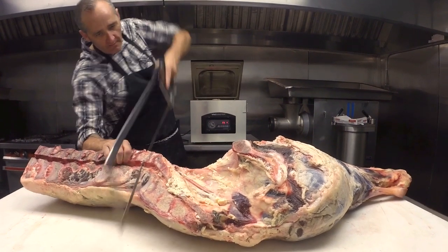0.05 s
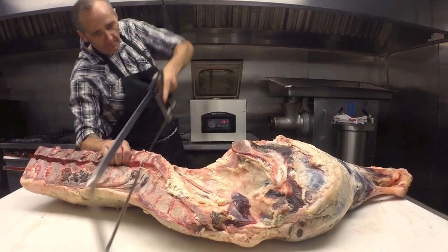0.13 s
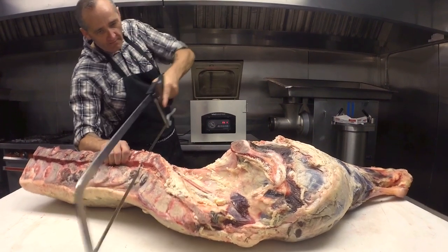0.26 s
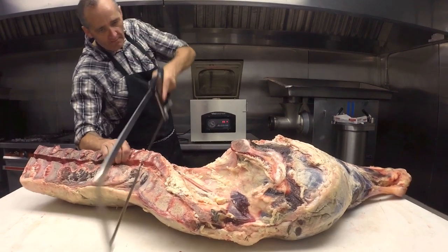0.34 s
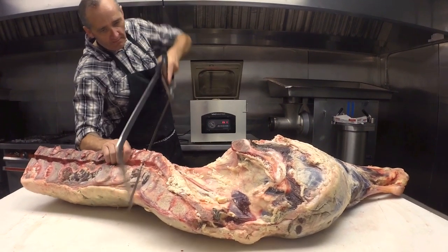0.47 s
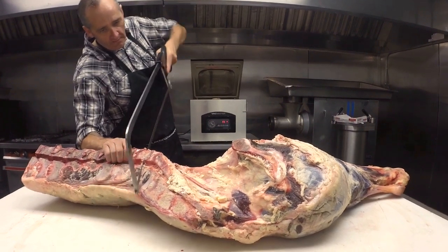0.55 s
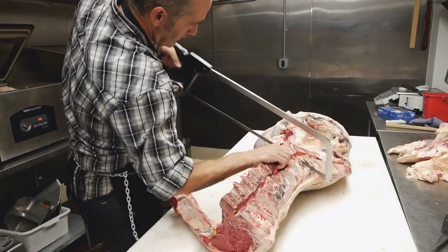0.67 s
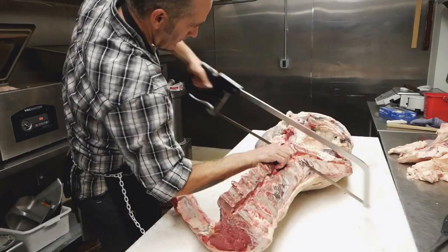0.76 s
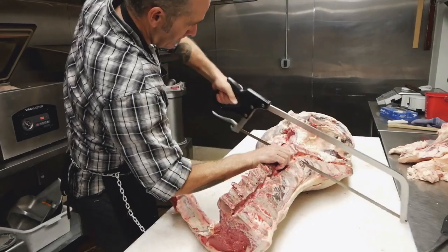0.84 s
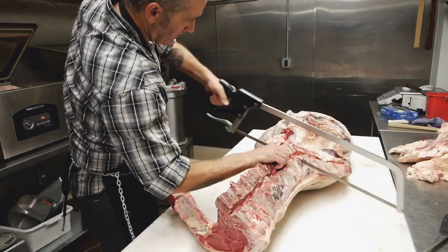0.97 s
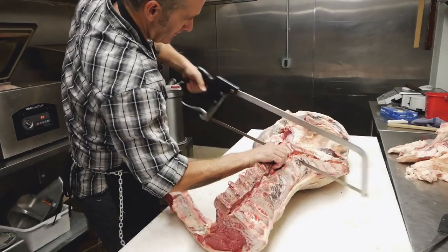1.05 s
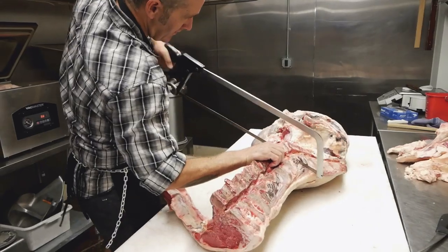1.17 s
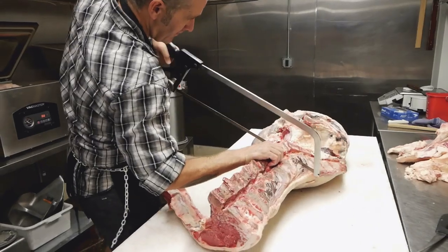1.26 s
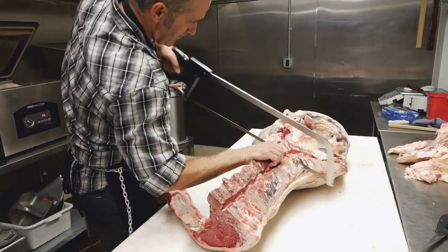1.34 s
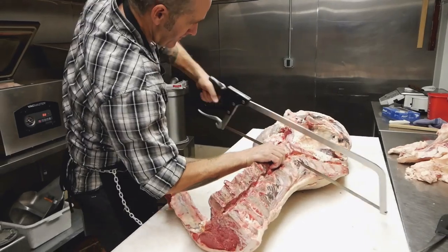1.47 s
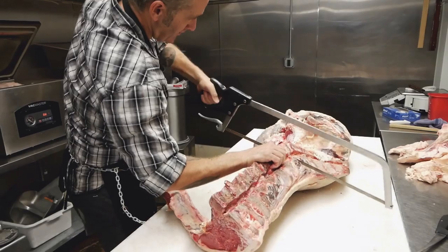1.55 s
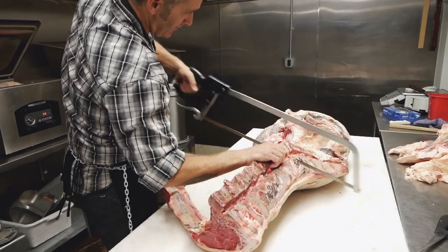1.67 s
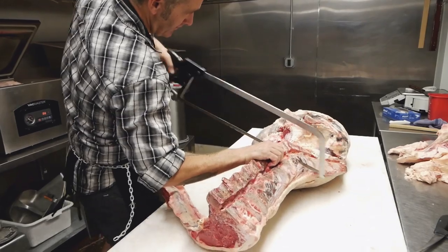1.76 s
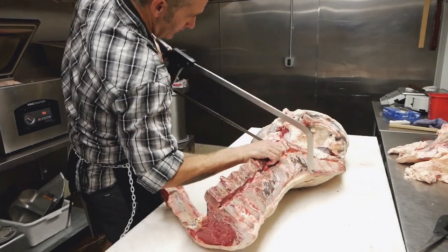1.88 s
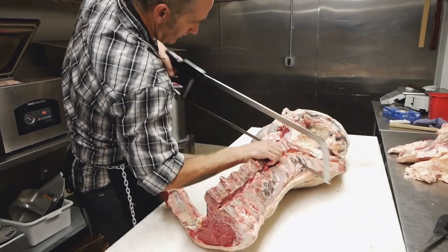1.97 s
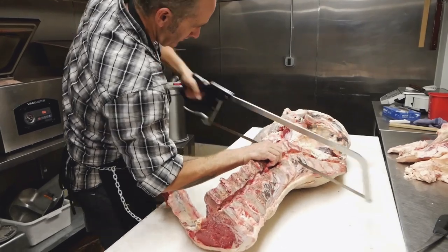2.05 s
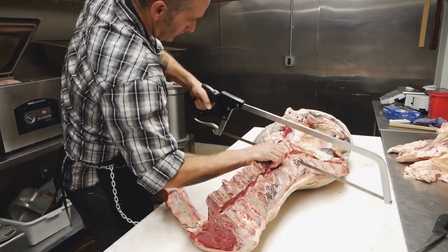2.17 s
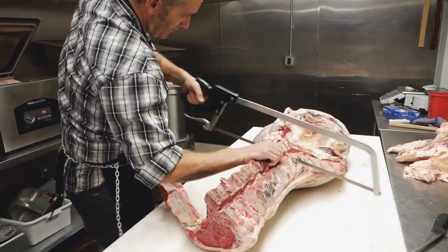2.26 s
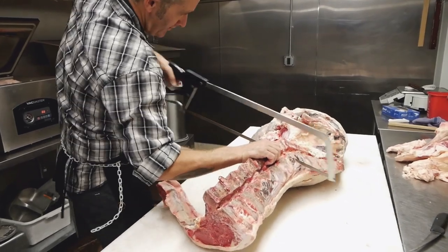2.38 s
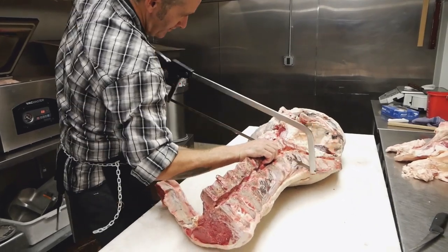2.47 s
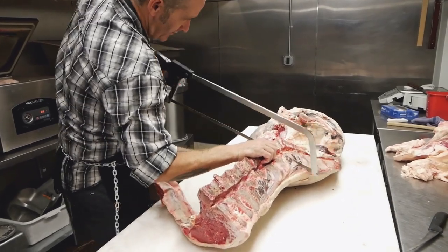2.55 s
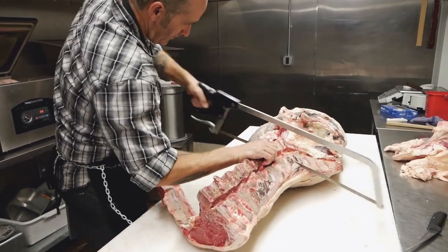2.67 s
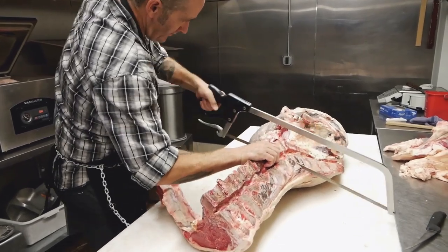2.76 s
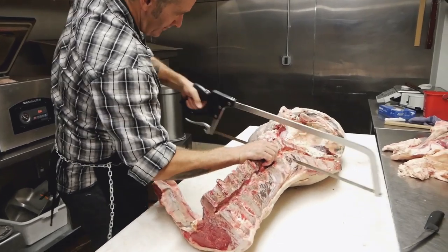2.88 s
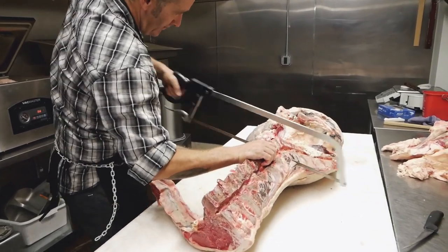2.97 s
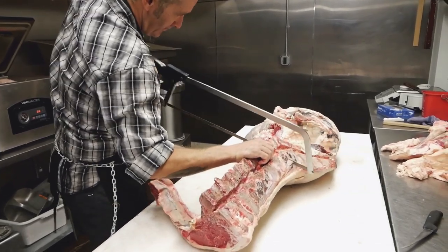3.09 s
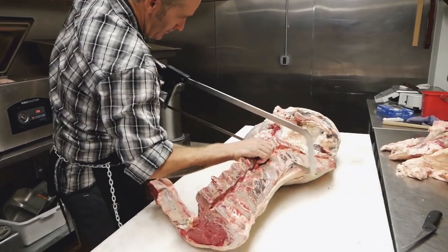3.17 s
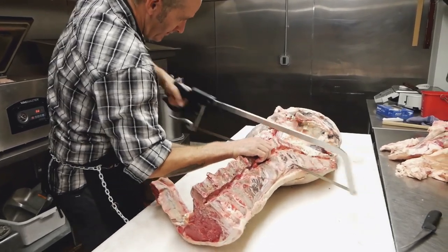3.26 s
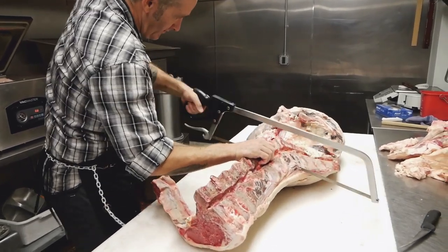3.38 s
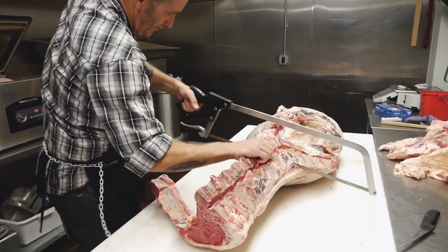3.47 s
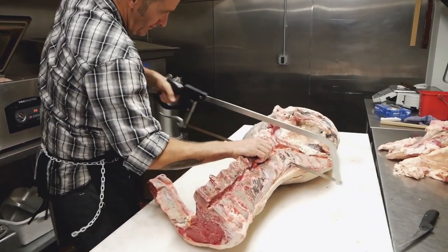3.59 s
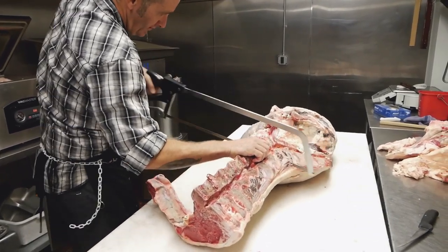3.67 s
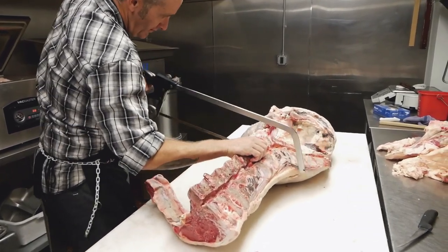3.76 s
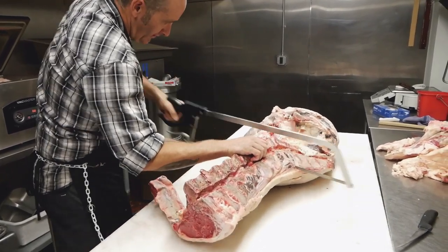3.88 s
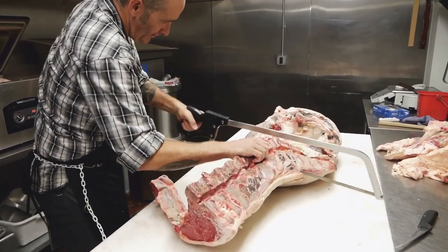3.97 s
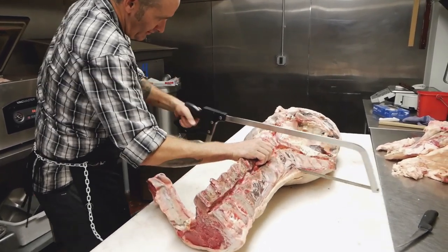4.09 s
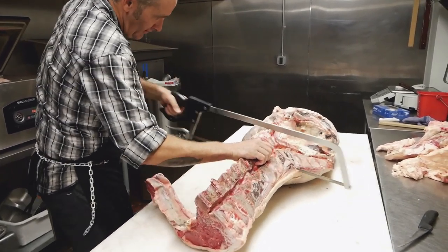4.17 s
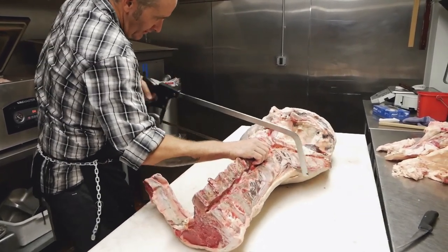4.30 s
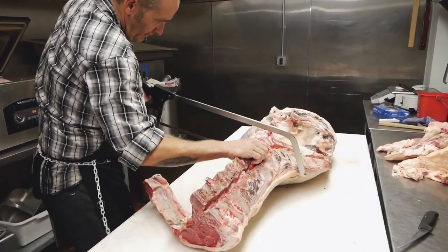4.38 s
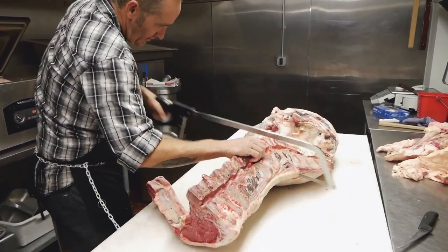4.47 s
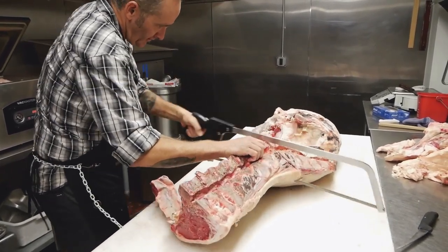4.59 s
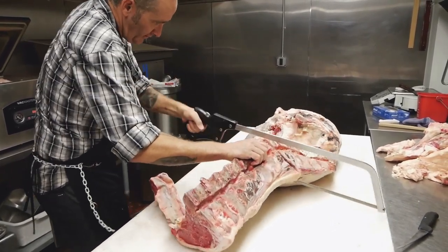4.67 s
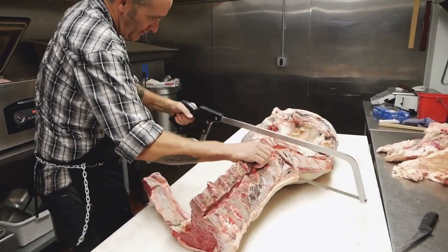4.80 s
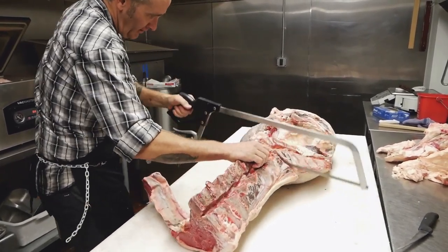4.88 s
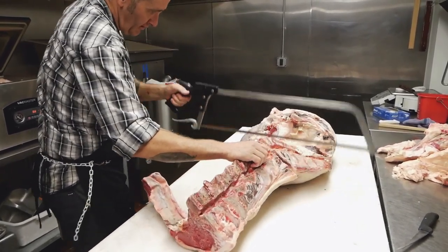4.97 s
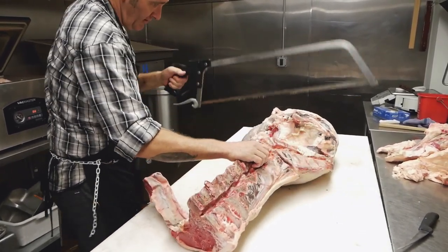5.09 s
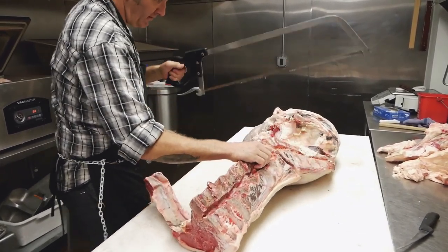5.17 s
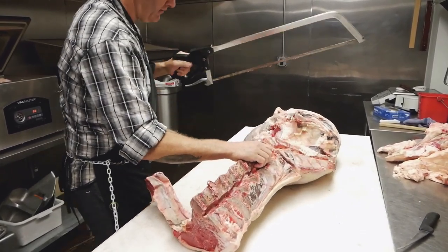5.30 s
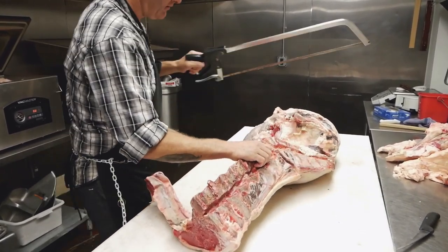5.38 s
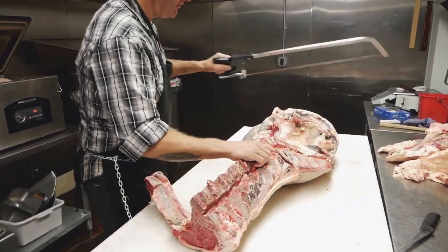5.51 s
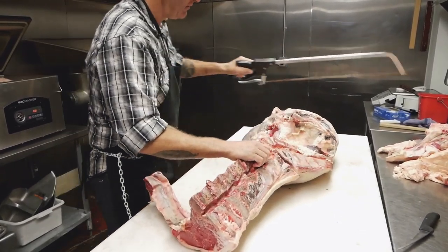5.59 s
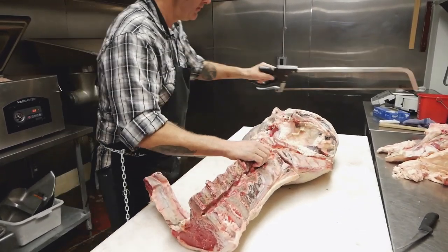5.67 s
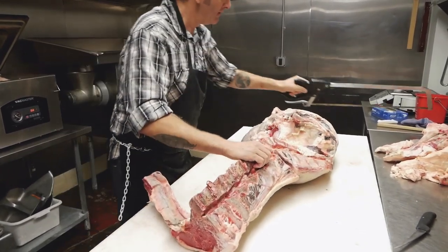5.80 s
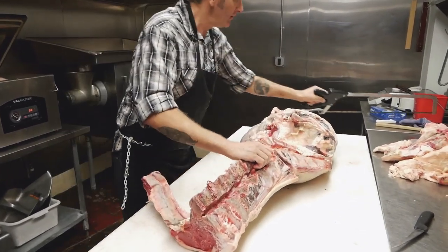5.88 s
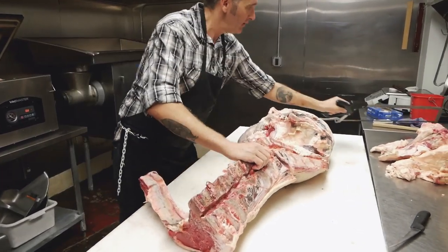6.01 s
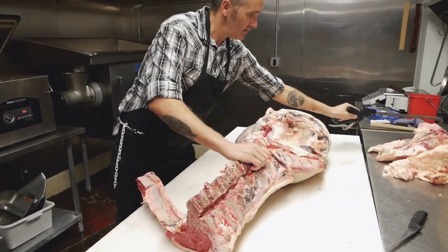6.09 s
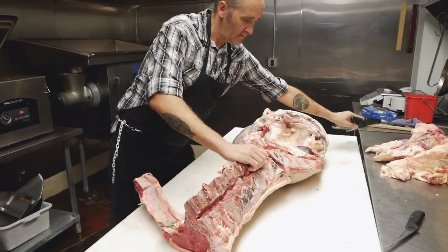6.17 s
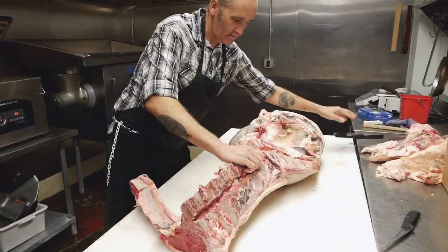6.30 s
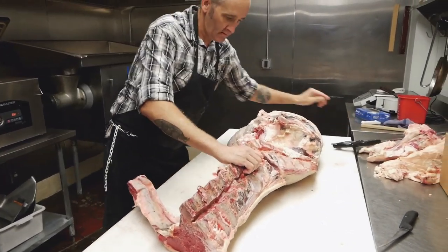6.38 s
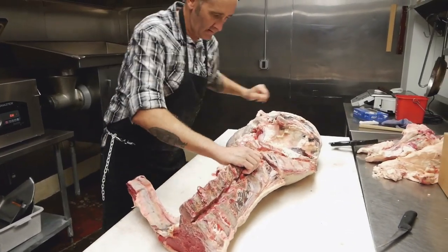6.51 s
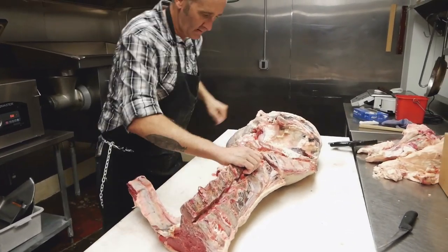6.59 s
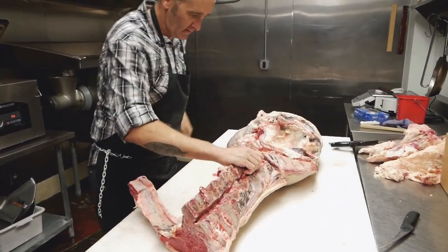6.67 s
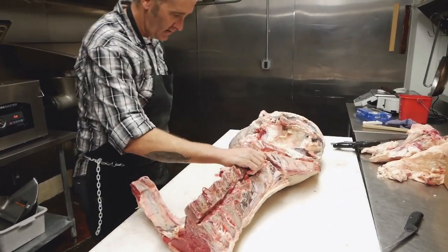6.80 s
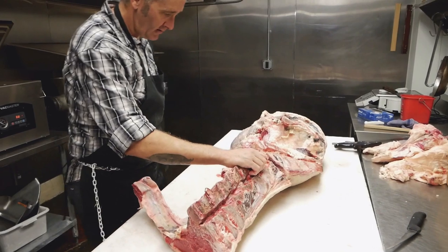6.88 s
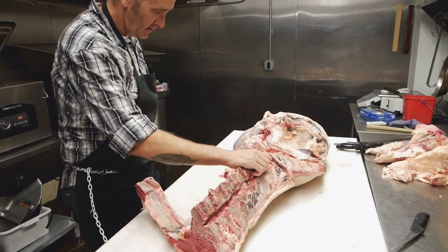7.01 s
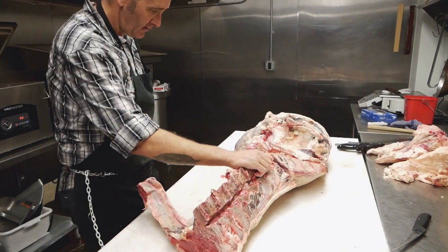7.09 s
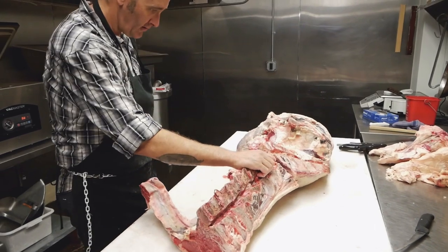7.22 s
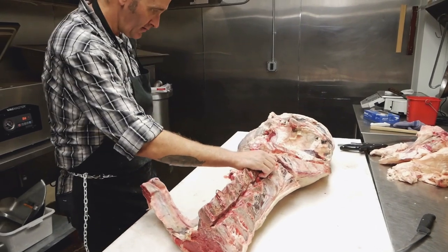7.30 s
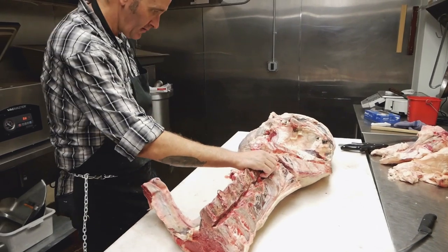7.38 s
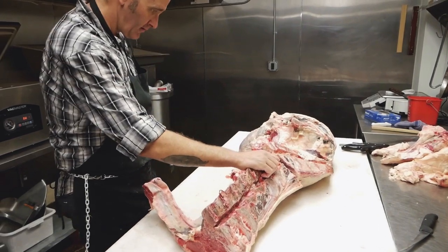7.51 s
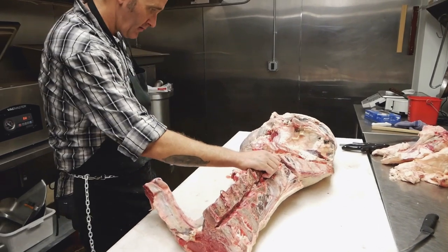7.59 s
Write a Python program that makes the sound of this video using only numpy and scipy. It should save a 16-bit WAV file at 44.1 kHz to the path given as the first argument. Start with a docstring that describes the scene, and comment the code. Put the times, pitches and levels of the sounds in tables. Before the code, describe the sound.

A low, airy refrigeration drone fills a small, hard, reflective kitchen throughout. From about 0.05 seconds a toothed hand saw rasps through beef bone, heard close and nearly central. Eight short, rough pushes come at roughly 0.1, 0.7, 1.4, 2.0, 2.6, 3.2, 3.9 and 4.5 seconds, with the seventh loudest. Much softer, higher pulls with a faint squeaky groan fall between them. Early strokes have a bright metallic blade ring; from 2.5 seconds the deep cut dulls it, leaving more dry crunch. Brittle bone snaps crack near 0.65, 2.85, 3.5 and 4.1 seconds, with soft bumps at 0.85 and 4.7. Sawing ends by 4.8, followed by a faint brush near 5.2. At 6.15 the steel saw hits the metal counter in a rapid clashing cluster with a hollow boom; the handle clacks sharply at 6.4, small rattles follow until 6.7, then only the drone remains.

```python
"""Hand saw through bone

A butcher's hand saw rasps through beef bone: eight hard pushes with light pulls between, and bone snaps.
Each passing tooth is a random bite that excites bone, blade and frame; the tooth rate adds a groan.
The saw is then dropped on a steel counter: noise bursts clash and rattle, decaying sines boom.
Its handle clacks down as short resonant bursts. A hard-walled kitchen answers with diffuse decaying noise,
and refrigeration drones throughout as coloured noise with humming resonances."""
import sys
import numpy as np
from scipy import signal
from scipy.fft import rfft, irfft, next_fast_len
from scipy.io import wavfile
from scipy.ndimage import uniform_filter1d, map_coordinates

SR = 44100
rng = np.random.default_rng(int(sys.argv[2]) if len(sys.argv) > 2 else 0)


def persist_wave(psi):
    """Save psi, clipped to +-1, as 16-bit WAV."""
    counts = np.round(np.clip(psi, -1, 1) * 32767).astype(np.int16)
    wavfile.write(sys.argv[1], SR, np.atleast_2d(counts).T)


N = 337365  # length [samples]

# Refrigeration air noise: (frequency [Hz], relative level [dB])
AIR_COLOUR = [(12, -35.5), (20, -3), (109, -5.5), (144, -1), (180, -9.5), (259, 0.5), (333, -17.5),
              (416, -3), (505, -41), (686, -18), (1040, -25.5), (1300, -23.5), (4070, -37.5),
              (15500, -45.5)]
# Humming refrigeration panels: (centre [Hz], width [Hz], relative level [dB])
HUM_MODES = [(145.4, 25, -3.5), (208.3, 19.2, 5), (265, 27, 1), (435, 150, -11.5), (664, 46, -12)]
# Hard pushes: (start [s], skidding [s], cutting [s], level [dB], mean tooth rate at full speed [teeth/s],
# bone body [dB], frame ring [dB])
PUSHES = [(0.062, .005, 0.15, -21.5, 612, -9.5, -13), (0.708, 0.005, 0.14, -23, 694, -10, -19),
          (1.355, 0.047, 0.083, -21, 727, -16, -15.5), (1.972, .03, 0.11, -19, 558, -10, -10.5),
          (2.597, .03, 0.12, -19.5, 720, -12.5, -17.5), (3.226, .002, 0.12, -18, 580, -11, -20.5),
          (3.862, 0.0092, 0.098, -14, 680, -10, -32), (4.478, 0.0051, 0.076, -18.5, 760, -6.5, -16.5)]
# Light pulls back: (start [s], skidding [s], cutting [s], level [dB], mean tooth rate at full speed [teeth/s],
# bone body [dB], frame ring [dB])
PULLS = [(0.41, 0.038, 0.062, -34.5, 1480, -8.5, -11.5), (1.022, 0.0033, 0.062, -31.5, 1480, -8.5, -13),
         (1.68, 0.036, 0.085, -34.5, 1260, -14, -13.5), (2.315, 0.061, 0.048, -35, 1205, -15, -6),
         (2.90, .005, 0.058, -33, 1140, -11.5, -18.5), (3.535, 0.0026, 0.0093, -40, 1420, -16, -29.5),
         (4.15, 0.056, .085, -37, 1110, -31, -39)]
# Resonances of the blade, at rest pitch: (centre [Hz], width [Hz], relative level [dB])
BLADE_MODES = [(3623, 49, 9), (3765, 57, 4.5), (3970, 110, -8), (4205, 92, 3.5), (4470, 110, 2),
               (4914, 120, 3.5), (5400, 180, -5), (6760, 350, -2.5), (10110, 300, -3.5)]
# Resonances of the frame that holds the blade: (centre [Hz], width [Hz], relative level [dB])
FRAME_MODES = [(1154, 34, 7.5), (1866, 61, 5.5), (1950, 30, -23.5)]
# Carcass rocking on the cutting board, one filter pass: (centre [Hz], width [Hz], relative level [dB])
BOARD_MODES = [(83.6, 26, 0)]
# Crunch of the teeth: (frequency [Hz], relative level [dB])
CRUNCH_COLOUR = [(1500, -44), (2050, -6), (2300, -6), (3100, -15), (3700, -0.5), (4600, -1.5), (6000, -2),
                 (8500, -5.5), (10400, -7), (11500, -8.5), (14000, -12.5), (15500, -32.5)]
# Body of the bone: (frequency [Hz], relative level [dB])
BONE_COLOUR = [(100, -22), (200, 2.5), (400, 3.5), (600, 2), (900, 2), (1300, 1.5), (1900, -0.5),
               (2600, 6.5), (3600, -23)]
# Bone snaps: (time [s], relative level [dB], centre [Hz], width [Hz], t60 of the force [s])
BONE_SNAPS = [(0.6575, -3.5, 6650, 2720, 0.0053), (2.854, 4, 4800, 900, 0.0052),
              (2.898, 3, 4800, 3200, 0.0045), (3.5315, -4.5, 7800, 5000, 0.0093),
              (4.0887, -0.5, 3000, 2000, 0.003), (4.3641, -18, 6000, 4990, 0.0048),
              (4.422, -20, 4197, 3970, 0.0059)]
# The saw bumps and brushes the carcass:
# (time [s], relative level [dB], centre [Hz], width [Hz], t60 of the force [s])
CARCASS_BUMPS = [(0.859, -6.5, 820, 270, 0.028), (0.859, -20.5, 83.5, 40, 0.034),
                 (1.045, -21, 4314, 598, .06), (4.275, -32.5, 2650, 704, 0.19),
                 (4.674, -12, 854, 460, 0.025), (5.168, -36, 760, 387, 0.4),
                 (5.17, -41.5, 5100, 2000, 0.37)]
# The saw meets the counter: (time [s], counter boom [dB], steel clash [dB], loose rattle [dB])
LANDINGS = [(6.149, -20.5, -15, -41.5), (6.159, -19, -16, -49.5), (6.179, -24, -16.5, -35),
            (6.218, -23, -23, -37), (6.382, -50, -47, -38.5), (6.393, -34, -22, -64.5),
            (6.563, -58, -42.5, -27), (6.586, -47, -34.5, -49), (6.675, -61, -65, -33)]
# Resonances of the counter top: (frequency [Hz], mean relative level [dB], t60 [s])
COUNTER_MODES = [(80.1, -16.5, 0.32), (165.1, 2, 0.3), (241.3, 5.5, 0.42), (271, 0, 0.63),
                 (351.5, -5.5, 0.28), (648, -27, 0.37), (780, -18, 0.22), (973, -8, 0.28), (1070, -9, 0.28)]
# Clash of the steel frame: (frequency [Hz], relative level [dB])
CLASH_COLOUR = [(180, -15), (300, -4.5), (476, -10), (800, -1), (1200, -9), (1480, -6), (2300, -12.5),
                (3750, -25.5), (5200, -20.5), (11000, -35.5), (12500, -34.5), (15500, -43)]
# Rattle of the loose blade: (frequency [Hz], relative level [dB])
RATTLE_COLOUR = [(300, -17.5), (630, -4), (1100, -8), (1700, -10), (2000, -31), (2300, -15), (2900, -19.5),
                 (3400, -14.5), (3900, -23), (5800, -21.5), (8600, -11.5), (9900, -24), (13000, -16.5),
                 (15500, -29.5)]
# The handle clacks down: (time [s], relative level [dB], centre [Hz], width [Hz], t60 of the force [s])
HANDLE_CLACKS = [(6.3895, 3, 1680, 580, 0.0071), (6.3895, 2, 4750, 1480, 0.0095)]
# Decay of the kitchen: (frequency [Hz], t60 [s])
KITCHEN_DECAY = [(150, 0.57), (800, 0.47), (4000, 0.5), (9000, 0.43), (15000, 0.19)]
# Stereo width: (frequency [Hz], side level [dB])
SIDE_LEVEL = [(60, -27), (150, -38), (2500, -41), (5000, -20), (9000, -15), (13000, -13)]

# The course of every stroke
CUT_THROUGH_S = 4.85  # end of the last stroke
ATTACK_S, BITE_S = 0.035, 0.044  # the blade gets moving; the teeth sink in
ONSET_DB = -27.5  # level at the turn, below the skid
PUSH_SKID_DB, PULL_SKID_DB = -10, -4.5  # skidding against cutting
PUSH_RELEASE_DB_PER_S, PULL_RELEASE_DB_PER_S = 144, 86  # fall once the arm eases off
PUSH_GROAN_DB, PULL_GROAN_DB = -16, -8.5  # tooth note, before the kerf grips
# The deepening kerf grips the blade, most when it is drawn back
PUSH_RING_DB, PULL_RING_DB = 1, 2  # ring of the free blade
GRIP_FROM_S = 2.54  # the blade is buried from here on
PUSH_GRIP_DB_PER_S, PULL_GRIP_DB_PER_S = 3, 14  # loss of ring from then on
TOP_HZ = 15700  # upper band limit


def amp(db):
    """Decibels to gain."""
    return 10 ** (np.asarray(db) / 20)


def unit(x):
    """Scale to rms 1."""
    return x / np.sqrt(np.mean(x ** 2) + 1e-20)


def along(points, hz):
    """Read (Hz, value) points on a log frequency axis."""
    f, v = np.transpose(points)
    return np.interp(np.log(hz + 1), np.log(f), v)


def wobble(rate):
    """A smooth random curve, rate knots a second."""
    return map_coordinates(rng.standard_normal(2048), [np.arange(N) * rate / SR], mode="wrap")


def filtered(x, response):
    """Filter x by a complex response of frequency."""
    n = x.shape[-1]
    m = next_fast_len(n + 8192)
    return irfft(rfft(x, m) * response(np.fft.rfftfreq(m, 1 / SR)), m)[..., :n]


def coloured(x, points, size=2048):
    """Give x a spectrum with a causal, minimum-phase filter."""
    cepstrum = irfft(np.log(amp(along(points, np.fft.rfftfreq(size, 1 / SR)))))
    # fold the cepstrum onto positive time
    cepstrum[1:size // 2] *= 2
    cepstrum[size // 2 + 1:] = 0
    impulse = irfft(np.exp(rfft(cepstrum)))
    return signal.fftconvolve(x, impulse)[:len(x)]


def resonate(x, modes):
    """Ring x through parallel resonances of alternating sign."""
    def response(f):
        total = 0
        for k, (centre, width, db) in enumerate(modes):
            damping = 1j * f * width
            total = total + (-1) ** k * amp(db) * damping / (centre * centre - f * f + damping)
        return total
    return filtered(x, response)


def burst(t60):
    """One second of noise that starts at rms 1 and dies away."""
    return rng.standard_normal(SR) * amp(-60 * np.arange(SR) / SR / t60)


def add(track, s, sound):
    """Mix a sound into the track at time s."""
    part = track[round(s * SR):][:len(sound)]
    part += sound[:len(part)]


def kitchen(x, wet_db):
    """Add the diffuse answer of the steel and tiled walls: noise whose decay depends on frequency."""
    hz, t, z = signal.stft(rng.standard_normal(SR * 3 // 4), SR, nperseg=256)
    decay = amp(-60 * t / along(KITCHEN_DECAY, hz)[:, None])
    tail = signal.istft(z * decay, SR, nperseg=256)[1]
    tail *= 1 - np.exp(-np.arange(len(tail)) / SR / 0.0014)  # soft onset
    return x + amp(wet_db) * signal.fftconvolve(x, tail / np.linalg.norm(tail))[:len(x)]


def refrigeration():
    """Steady fan air with a few humming panels, which are noise through resonances."""
    air = unit(filtered(rng.standard_normal(N), lambda hz: amp(along(AIR_COLOUR, hz))))
    panels = resonate(rng.standard_normal(N), HUM_MODES)
    hum = unit(filtered(panels, lambda hz: 1 / (1 + (hz / 700) ** 4)))
    return amp(-42) * air + amp(-42.5) * hum


def strokes():
    """Blade speed (0-1), rising and falling between turns; direction (0 push, 1 pull); stroke settings."""
    start, _, _, _, *settings = np.transpose(sorted(PUSHES + PULLS))
    turns = np.append(start - ATTACK_S, CUT_THROUGH_S)
    progress = np.interp(np.arange(N) / SR, turns, np.arange(len(turns)))
    which = np.minimum(progress.astype(int), len(start) - 1)
    speed = np.abs(np.sin(np.pi * progress)) ** 0.85
    direction = np.arange(len(start)) % 2.0
    # smooth the steps from stroke to stroke
    return [speed] + [uniform_filter1d(c[which], size=1024) for c in [direction, *settings]]


def effort(rows, skid_db, release_db_per_s):
    """Loudness of a set of strokes: each gets moving, skids, bites, holds and dies away."""
    t, power = np.arange(N) / SR, np.zeros(N)
    for start, skid, cut, db, *_ in rows:
        u = t - start
        attack = ONSET_DB * np.maximum(-u / ATTACK_S, 0)
        bite = skid_db * np.clip(1 - (u - skid) / BITE_S, 0, 1)
        release = release_db_per_s * np.maximum(u - skid - cut, 0)
        power += amp(db + attack + bite - release) ** 2
    return np.sqrt(power)


def teeth(passed, size_db, dust):
    """One bite of random size per passing tooth, early or late by chance, over crumbling bone dust."""
    slip, size = rng.standard_normal((2, 8192))[:, :int(passed[-1])]
    tooth = np.arange(len(slip)) + 0.25 * slip
    when = np.interp(tooth, passed, np.arange(N))
    bites = np.bincount(when.astype(int), amp(size_db * np.tanh(size)), N)
    bites = unit(bites) + dust * rng.standard_normal(N)
    # even out the loudness; the strokes set it later
    return bites / np.sqrt(np.abs(uniform_filter1d(bites ** 2, size=1024)) + 1e-9)


def blade_ring(bites, shift_db, bend):
    """As the contact travels along the blade its modes trade strength and bend in pitch."""
    ring = sum(resonate(bites, [mode]) * amp(shift_db * wobble(12)) for mode in BLADE_MODES)
    read_at = np.arange(N) + np.cumsum(bend * wobble(12))  # uneven playback bends the pitch
    return unit(np.interp(read_at, np.arange(N), ring))


def groan(passed, catch_db):
    """The tooth note and its octave, which catch and break off by chance."""
    note, octave = np.sin(2 * np.pi * passed), np.sin(2 * np.pi * 2 * passed)
    tone = note * amp(catch_db * np.tanh(wobble(35)))
    tone += amp(-8.5) * octave * amp(catch_db * np.tanh(wobble(38)))
    return unit(kitchen(tone, wet_db=-3.5))


def sawing():
    """Teeth crunch the bone, groan at their passing rate and ring the blade until the deep kerf grips it."""
    push_level = effort(PUSHES, PUSH_SKID_DB, PUSH_RELEASE_DB_PER_S)
    pull_level = effort(PULLS, PULL_SKID_DB, PULL_RELEASE_DB_PER_S)
    level = np.hypot(push_level, pull_level)
    speed, pulling, top_rate, body_db, frame_db = strokes()

    def by_direction(push, pull):
        """Blend the push and pull settings by the direction of travel."""
        return push + (pull - push) * pulling

    buried_s = np.maximum(np.arange(N) / SR - GRIP_FROM_S, 0)
    damping_db = by_direction(PUSH_GRIP_DB_PER_S, PULL_GRIP_DB_PER_S) * buried_s
    ring_db = by_direction(PUSH_RING_DB, PULL_RING_DB) - damping_db
    groan_db = by_direction(PUSH_GROAN_DB, PULL_GROAN_DB - 1.8 * damping_db)

    judder = 1 + by_direction(0.04, 0.07) * wobble(120)  # the blade judders in the kerf
    passed = np.cumsum(top_rate * speed * judder) / SR  # running count of teeth
    pressure = amp(1.22 * wobble(70))

    def contact():
        """Bites under the hand's pressure, with the kitchen's answer."""
        return pressure * unit(kitchen(teeth(passed, size_db=3.5, dust=0.9), wet_db=-1.5))

    bites = contact()  # bites that crunch the bone and drive body, frame and board
    blade_bites = contact()  # a second, independent draw of the same bites, which rings the blade
    grip = 1 / np.hypot(amp(ring_db), 1)  # a gripped blade rings less and drags the carcass along
    ring = amp(ring_db) * blade_ring(blade_bites, shift_db=4.0, bend=0.016)
    treble = grip * (ring + unit(coloured(bites, CRUNCH_COLOUR)))
    rocking = grip ** 2 * amp(-20.5) * unit(resonate(resonate(bites, BOARD_MODES), BOARD_MODES))
    body = amp(body_db) * unit(coloured(bites, BONE_COLOUR))
    frame = amp(frame_db) * unit(resonate(bites, FRAME_MODES))
    # teeth and frame sing mostly in the fast middle of a stroke
    singing = speed ** 2 * (amp(groan_db) * groan(passed, catch_db=8) + frame)
    return kitchen(level * (treble + body + singing + rocking), wet_db=-27)


def knocks(rows, wet_db):
    """Each short burst of force rings one broad resonance."""
    out = np.zeros(N)
    for s, db, hz, width, t60 in rows:
        ringing = resonate(burst(t60), [(hz, width, 0)])
        knock = filtered(ringing, lambda f: 1 / (1 + 1j * f / 11000))  # soften the top
        knock *= np.sqrt(t60 * SR) / np.linalg.norm(knock) / 8  # energy in proportion to t60
        add(out, s, amp(db) * kitchen(knock, wet_db))
    return out


def landing():
    """Each contact booms the counter top, clashes the frame and shakes the loose blade."""
    out, t = np.zeros(N), np.arange(SR) / SR

    def strike(colour, t60):
        """A coloured burst with energy in proportion to its t60."""
        return unit(coloured(burst(t60), colour)) * np.sqrt(t60 / np.log(10 ** 6))

    for s, boom_db, clash_db, rattle_db in LANDINGS:
        boom = np.zeros(SR)
        for hz, db, t60 in COUNTER_MODES:
            mode_db = db + rng.normal(0, 0.87)  # each blow excites the modes a little differently
            boom += amp(mode_db - 60 * t / t60) * np.sin(2 * np.pi * hz * t)
        boom *= 1.2 * (1 - np.exp(-t / 0.007))  # soft onset
        chatter = unit(amp(2.3 * wobble(183)[:SR]))  # the loose parts touch again and again
        clash = amp(clash_db) * strike(CLASH_COLOUR, t60=0.16)
        rattle = amp(rattle_db) * strike(RATTLE_COLOUR, t60=0.29)
        add(out, s, amp(boom_db) * boom + kitchen(chatter * (clash + rattle), wet_db=1))
    return out + knocks(HANDLE_CLACKS, wet_db=-4)


def scene():
    """All sources near the centre, with a little width in the treble from scattered sound."""
    mid = refrigeration() + sawing() + landing()
    mid += knocks(BONE_SNAPS, wet_db=-3) + knocks(CARCASS_BUMPS, wet_db=-1.0)
    scatter = burst(0.12)
    diffuse = signal.fftconvolve(mid, scatter / np.linalg.norm(scatter))[:N]
    side = filtered(diffuse, lambda hz: amp(along(SIDE_LEVEL, hz)))
    return np.array([mid + side, mid - side])


def record(dry):
    """Round off the sharpest peaks by soft saturation and keep nothing above the band limit."""
    rounded = dry / (1 + np.abs(dry / 0.85) ** 4) ** (1 / 4)
    return filtered(rounded, lambda hz: hz < TOP_HZ)


dry = scene()
out = record(dry)
persist_wave(out)
```